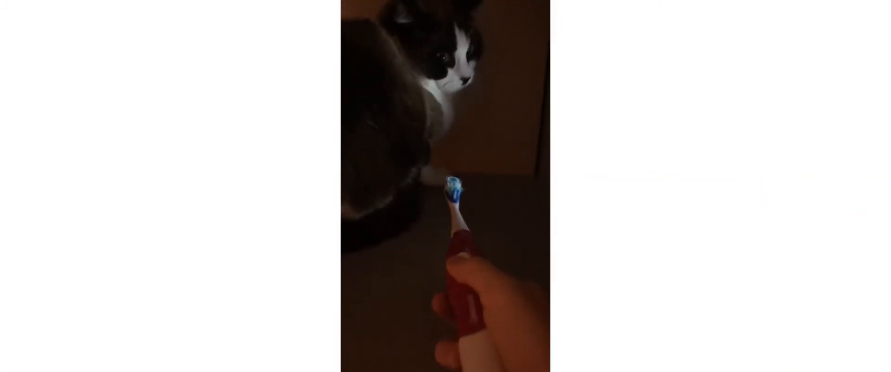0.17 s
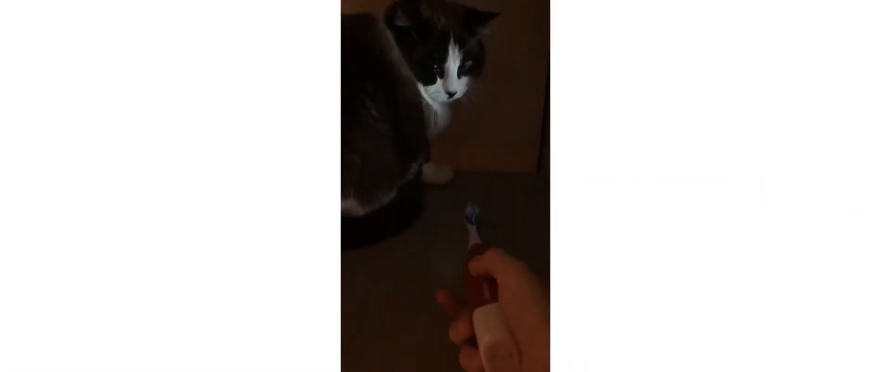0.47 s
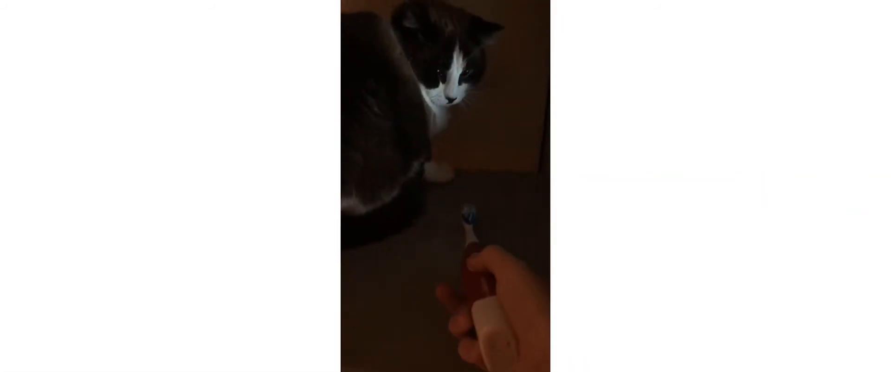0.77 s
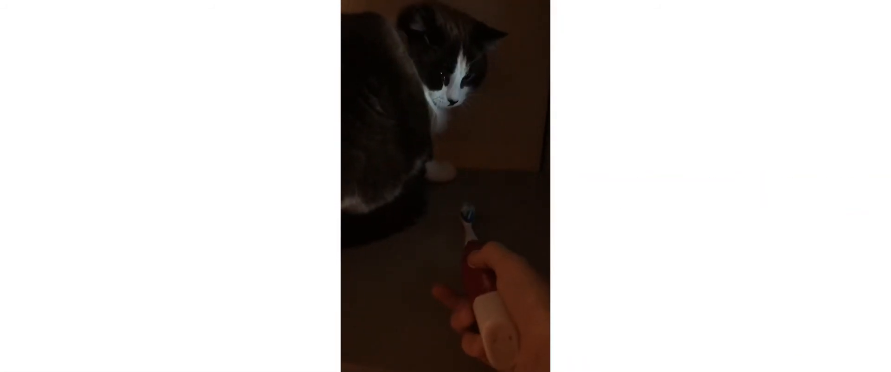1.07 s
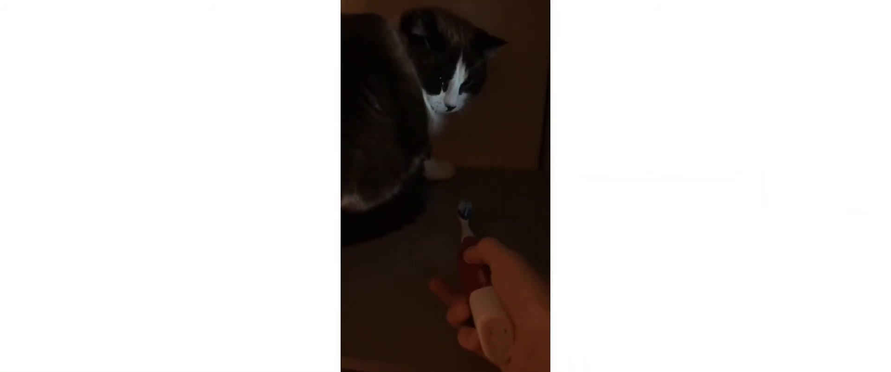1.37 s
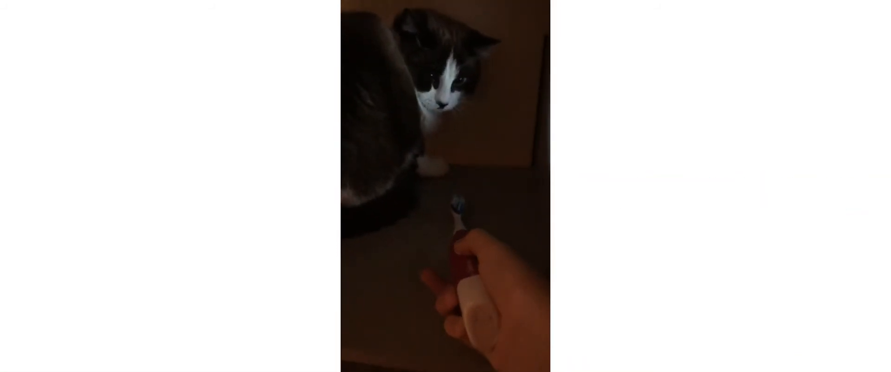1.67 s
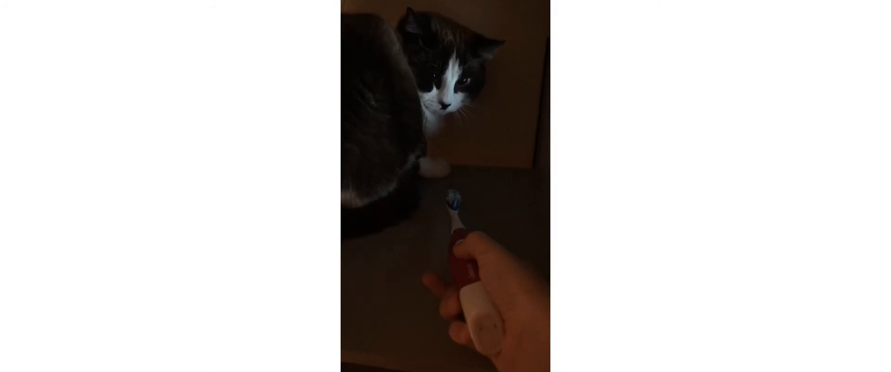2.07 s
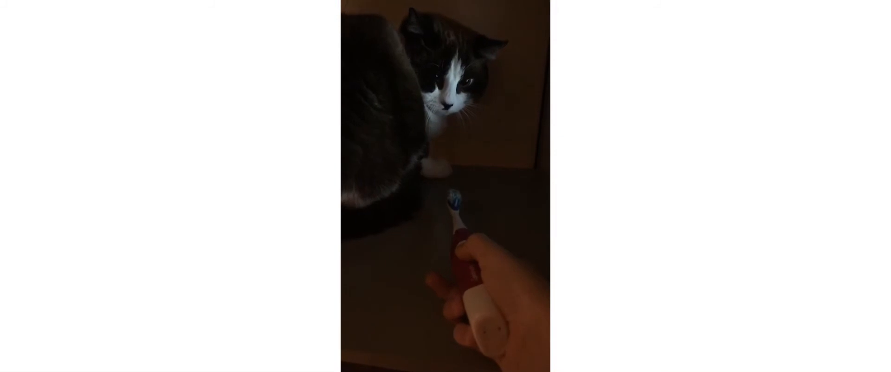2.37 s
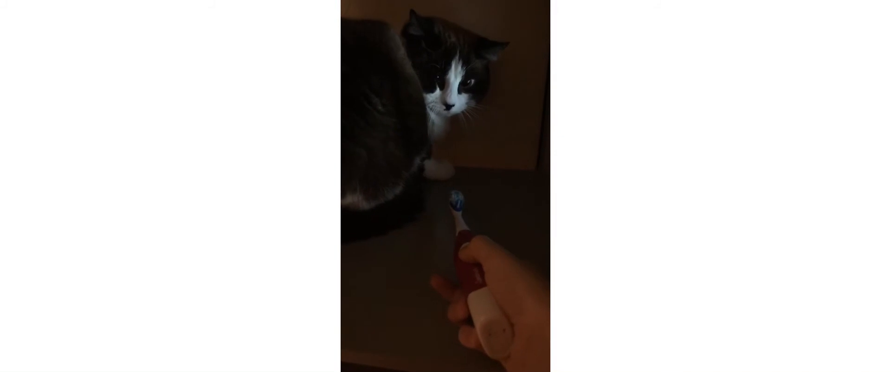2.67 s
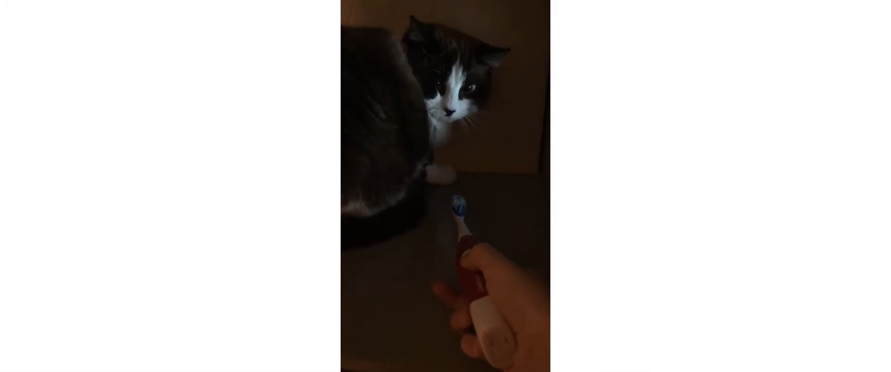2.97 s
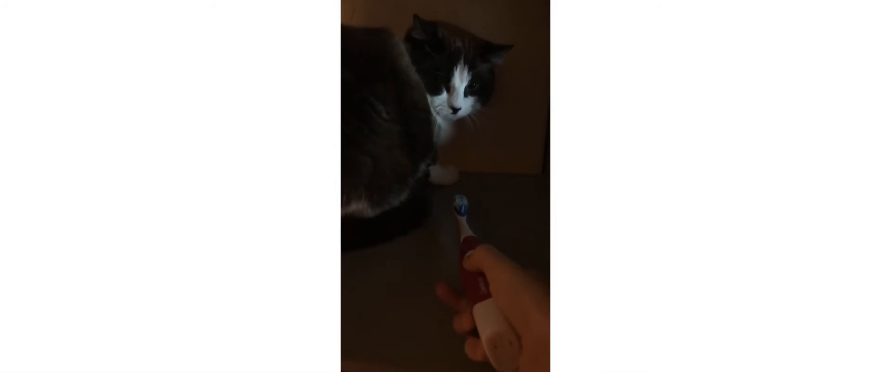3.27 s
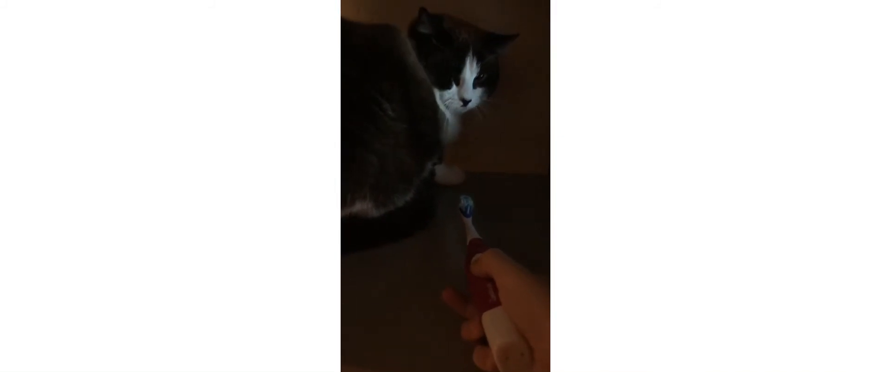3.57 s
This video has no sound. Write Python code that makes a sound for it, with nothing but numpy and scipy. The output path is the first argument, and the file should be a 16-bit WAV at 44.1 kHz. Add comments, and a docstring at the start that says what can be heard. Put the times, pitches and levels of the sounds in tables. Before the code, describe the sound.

Electric toothbrush running free, a rapid harsh rattling buzz, close and dry in a quiet room.

```python
"""A hard, bright rattle buzzing at about 57 swings a second: a battery toothbrush running free in the hand,
close by in a quiet room. Its drive knocks through its play at both ends of the swing (click trains).
The knocks and the rubbing gears (swelling noise grains) ring the plastic handle (resonators).
Under them lie faint drive tones and a motor whine (sines), a low hum and room air (filtered noise)."""
import sys
import numpy as np
from scipy import signal
from scipy.fft import rfft, irfft
from scipy.io import wavfile
from scipy.ndimage import uniform_filter1d

SR = 44100
rng = np.random.default_rng(int(sys.argv[2]) if len(sys.argv) > 2 else 0)


def bounce(signal):
    """Save signal as a 16-bit WAV file at the path given by the first command-line argument."""
    frames = np.transpose(np.atleast_2d(signal))
    limited = np.clip(frames, -1, 1)
    pcm = np.round(limited * 32767).astype(np.int16)
    wavfile.write(sys.argv[1], SR, pcm)


N = 164052

# Drive speed: (time [s], rate [swings/s])
DRIVE_SPEED = [(0.0, 57.5), (0.2, 56.91), (0.4, 56.75), (0.55, 56.83), (0.7, 57.14), (0.8, 56.72),
               (0.92, 56.9), (1.2, 57.12), (1.6, 56.94), (1.85, 56.68), (2.2, 56.71), (2.4, 56.53),
               (2.6, 56.63), (2.95, 56.32), (3.3, 56.47), (3.72, 56.2)]
START_SWINGS = .04
# Knocks in one swing: (place [swings], thud level [dB], tick level [dB], timing scatter [s], level scatter [dB])
SWING_KNOCKS = [(-.125, -12, -2.5, .00026, 1.6), (-.026, 0, -3, .00016, 1.2),
                (.083, -5.5, -17, .00018, 1.7), (.407, -10.5, -4.5, .00022, 1.8)]
# Colour of the dull thuds: (frequency [Hz], gain [dB])
THUD_COLOUR = [(100, -29.5), (500, -25), (1050, -23.5), (1300, -17.5), (2000, -10.5), (3050, -7.5),
               (3550, -2), (4400, -4), (5200, -2.5), (7200, -2), (7600, -7.5), (9000, -6.5), (11000, -8.5),
               (12500, -3), (13100, -37), (16000, 1.5), (18000, -22)]
# Colour of the bright ticks: (frequency [Hz], gain [dB])
TICK_COLOUR = [(100, -39), (1000, -33), (1700, -12), (3000, -8.5), (5200, 0), (7100, 0), (7700, -9),
               (9500, -0.5), (11000, -2), (13300, -2), (15000, -3), (16000, -9), (18000, -14)]
CHATTER_S, CHATTER_DB = 0.00033, 0  # decay time constant, level relative to the knock
SPREAD_S, SPREAD_STEP_HZ = .00032, 687  # scale of the random delays, spacing in frequency
# Colour of the gear friction: (frequency [Hz], gain [dB])
RUB_COLOUR = [(100, -27), (600, -22.5), (1050, -21.5), (1270, -4), (1550, -7.5), (2400, -5), (3000, -3.5),
              (3600, -1.5), (4400, -4), (5200, -2), (7200, -1.5), (7600, -5), (12000, -9), (16000, -21),
              (18000, -42)]
RUB_DB, RUB_GRAIN_DB = -6.5, 3  # level relative to the knocks, scatter of grain size
RUB_SWELL, RUB_PEAK_SWINGS = 0.16, 0.49  # depth as a fraction, place of the peak in the swing
# Handle resonances, level relative to the plain shell:
# (frequency [Hz], width [Hz], level in grip 0 [dB], in grip 1 [dB], in grip 2 [dB])
HANDLE_MODES = [(1730, 49, 4.5, -1, -7), (1770, 61, -21, 1, 6), (2220, 97, -26, -18, 3),
                (2385, 95, 7.5, 6, -11), (3717, 240, -5.5, -3.5, 1), (4240, 210, -30, 3.5, 4),
                (4770, 216, 2, 6, 4), (5520, 204, 3.5, -3, -1.5), (6530, 120, 4, 0.5, -25),
                (8550, 150, 4, -6, -4), (9350, 260, -5, -10, -15), (9770, 80, -13, -4, 0),
                (10480, 160, -2, -18, -6), (12540, 360, -19, -6, -6)]
# Hand changing its grip twice: (time [s], grip [0-2])
GRIP_POSITION = [(.24, 0), (.42, 1), (1.75, 1.08), (2.1, 2)]
EARLY_S, EARLY_DB = 0.0031, -5  # echoes off hand and floor: decay time constant, level
TAIL_S, TAIL_DB = 0.006, -9.5  # room tail: decay time constant, level
THUD_WET_DB, TICK_WET_DB = 1.5, 0  # the ticks echo less
# Uneven loudness of four rattle bands over time, with a brief dip near 0.43 s;
# only the departure from each band's mean counts:
# (time [s], low mids [dB], presence [dB], treble [dB], top [dB])
RATTLE_BANDS = [(0.0, -44.0, -35.3, -37.5, -44.2), (0.2, -43.1, -34.0, -35.3, -41.9),
                (0.3, -44.5, -34.2, -37.9, -44.5), (0.38, -41.9, -32.1, -38.6, -39.5),
                (0.43, -43.8, -34.4, -40.2, -45.6), (0.5, -43.4, -32.8, -37.2, -41.1),
                (0.85, -43.2, -34.1, -37.5, -40.7), (1.3, -44.4, -33.1, -37.1, -41.6),
                (1.8, -45.4, -34.0, -38.8, -41.9), (2.05, -45.8, -34.1, -38.6, -45.8),
                (2.45, -45.9, -34.7, -38.0, -45.6), (3.1, -46.1, -35.1, -39.2, -46.7),
                (3.5, -45.8, -33.5, -37.6, -46.6), (3.72, -45.3, -34.1, -37.8, -46.7)]
# Centres of those four bands: (frequency [Hz])
RATTLE_CENTRES_HZ = (1930, 5250, 10900, 13700)
RATTLE_DB = -31.5
# Clean drive tones: (multiple of the swing rate [1], level [dB])
DRIVE_HARMONICS = [(2, -81), (3, -72), (5, -81), (10, -79.5), (11, -73), (13, -76), (17, -75.5)]
# Motor whine: (time [s], frequency [Hz], level [dB])
MOTOR_WHINE = [(0, 495.6, -78), (.87, 499.4, -69.5), (2.2, 493.6, -68), (3.72, 491, -65.5)]
# Thin high motor tone, sinking in level as the brush is lowered: (time [s], level [dB])
MOTOR_OVERTONE = [(0, -61.5), (.35, -65), (1.2, -77), (3.72, -78)]
OVERTONE_HZ = 1160
# Low hum: (time [s], level [dB])
HUM_LEVEL = [(0.02, -62), (0.09, -67), (0.84, -59.5), (2.66, -62.5), (3.24, -67), (3.5, -76), (3.57, -77),
             (3.7, -69)]
HUM_HZ, HUM_THIRD_DB = 59.7, -10.5
# Colour of the room air: (frequency [Hz], density [dB per Hz, relative])
AIR_COLOUR = [(20, -44), (32, -10), (45, 0), (80, 2.5), (130, 1.5), (250, -6.5), (500, -7), (1000, -5),
              (4000, -10), (16000, -44)]
AIR_DB = -60.5
TOP_HZ = 15750


def knocks(turn, t):
    """Linkage play: four scattered contacts a swing, each a thud and a tick with chatter and echoes."""
    swings = np.arange(int(turn[-1]) + 2)
    thuds = ticks = 0
    for place, thud_db, tick_db, scatter_s, scatter_db in SWING_KNOCKS:
        late, hard, bright = np.clip(rng.standard_normal((len(swings), 3)).T, -2, 2)
        times_s = np.interp(swings + place, turn, t, left=-1, right=10) + scatter_s * late
        thud_sizes = undb(thud_db + scatter_db * hard)
        tick_sizes = undb(tick_db + scatter_db * (hard + bright) / np.sqrt(2))
        thuds = thuds + disperse(clicks(times_s, thud_sizes))
        ticks = ticks + disperse(clicks(times_s, tick_sizes))
    thuds = colour(room(chatter(thuds), THUD_WET_DB), THUD_COLOUR)
    ticks = colour(room(chatter(ticks), TICK_WET_DB), TICK_COLOUR)
    return level(thuds + ticks, 0)


def chatter(hits):
    """The contact chatters briefly: a short noise burst follows each hit."""
    return hits + undb(CHATTER_DB) * smear(hits, CHATTER_S)


def disperse(x):
    """Bending waves in the shell arrive at different times by pitch: an all-pass ring, fixed within a call."""
    f = np.fft.rfftfreq(N, 1 / SR)
    delays_s = SPREAD_S * np.minimum(rng.exponential(size=128), 3)
    delay_s = np.interp(f / SPREAD_STEP_HZ, np.arange(len(delays_s)), delays_s)
    phase = 2 * np.pi * np.cumsum(delay_s) * f[1]  # integral of delay over frequency
    return irfft(rfft(x) * np.exp(-1j * phase), N)


def gears(turn):
    """Gear friction: noise grains of uneven size that swell once a swing."""
    grains = rng.standard_normal(N) * undb(RUB_GRAIN_DB * rng.standard_normal(N))
    swell = 1 + RUB_SWELL * np.cos(2 * np.pi * (turn - RUB_PEAK_SWINGS))
    return level(colour(grains * swell, RUB_COLOUR), RUB_DB)


def handle(x, t):
    """The plastic shell adds short resonances; the grip decides how freely each one rings."""
    grip = np.interp(t, *np.array(GRIP_POSITION).T)
    out = x
    for hz, width_hz, *grip_db in HANDLE_MODES:
        mode = signal.lfilter(*signal.iirpeak(hz, hz / width_hz, fs=SR), x)
        gain = np.interp(grip, np.arange(len(grip_db)), undb(grip_db))
        out = out + gain * mode
    return out


def band_levels(x, t):
    """Four overlapping bands of the rattle rise and fall about their mean levels in dB."""
    times_s, *curves = np.array(RATTLE_BANDS).T
    f = np.fft.rfftfreq(N, 1 / SR)
    spectrum = rfft(x)
    out = 0
    for shape, curve in zip(np.eye(len(curves)), curves):
        band = irfft(spectrum * np.interp(f, RATTLE_CENTRES_HZ, shape), N)
        db = np.interp(t, times_s, curve)
        out = out + band * undb(db - db.mean())
    return out


def motor(turn, t):
    """Motor whine and thin overtone, plus wavering sines at multiples of the swing rate."""
    times_s, hz, db = np.array(MOTOR_WHINE).T
    whine_cycles = np.cumsum(np.interp(t, times_s, hz)) / SR
    out = tone(whine_cycles, np.interp(t, times_s, db))
    out = out + tone(OVERTONE_HZ * t, np.interp(t, *np.array(MOTOR_OVERTONE).T))
    for multiple, db in DRIVE_HARMONICS:
        out = out + tone(round(multiple) * turn, db + 1.5 * walk(5.42))
    return out


def room(x, wet_db):
    """Quick echoes off nearby surfaces, then a short tail, as two decaying noise smears."""
    early = undb(EARLY_DB) * smear(x, EARLY_S)
    tail = undb(TAIL_DB) * smear(x, TAIL_S)
    return x + undb(wet_db) * (early + tail)


def background(t):
    """Low hum with its third harmonic, over room air made of coloured noise."""
    db = np.interp(t, *np.array(HUM_LEVEL).T)
    hum = tone(HUM_HZ * t, db) + tone(3 * HUM_HZ * t, db + HUM_THIRD_DB)
    air = level(colour(rng.standard_normal(N), AIR_COLOUR), AIR_DB)
    return hum + air


def undb(db):
    """Decibels to gain."""
    return 10 ** (np.asarray(db) / 20)


def level(x, db):
    """Scale to unit rms, then apply a fixed or moving level."""
    return x * undb(db) / np.sqrt(np.mean(x ** 2))


def tone(cycles, db):
    """A sine at an rms level, from a random phase."""
    return level(np.sin(2 * np.pi * (cycles + rng.random())), db)


def walk(rate_hz):
    """Smooth random wander with a spread near 1: held noise, averaged twice."""
    k = int(SR / rate_hz)
    steps = np.repeat(rng.standard_normal(N // k + 1), k)
    return 2.3 * uniform_filter1d(uniform_filter1d(steps, k), k)[:N]


def clicks(times_s, sizes):
    """One impulse at each time."""
    inside = (times_s >= 0) & (times_s * SR < N)
    return np.bincount((times_s[inside] * SR).astype(int), sizes[inside], N)


def smear(x, decay_s):
    """Dense, ever-changing echoes: noise shaped by the decaying energy of the sound."""
    keep = np.exp(-1 / (decay_s * SR))
    energy = signal.lfilter([1 - keep], [1, -keep], x ** 2 + 1e-18)
    return np.sqrt(energy) * rng.standard_normal(N)


def colour(x, points, size=4096):
    """Causal minimum-phase filter through (Hz, dB) points, by folding the cepstrum."""
    hz, db = np.array(points).T
    f = np.maximum(np.fft.rfftfreq(size, 1 / SR), 1)
    cepstrum = irfft(np.log(undb(np.interp(np.log(f), np.log(hz), db))))
    cepstrum[1:size // 2] *= 2
    cepstrum[size // 2 + 1:] = 0
    response = irfft(np.exp(rfft(cepstrum)))
    return signal.fftconvolve(x, response)[:N]


def scene():
    """Knocks and gears drive the handle; motor and background add to the rattle."""
    t = np.arange(N) / SR
    turn = START_SWINGS + np.cumsum(np.interp(t, *np.array(DRIVE_SPEED).T)) / SR
    shell = handle(knocks(turn, t) + gears(turn), t)
    rattle = level(band_levels(shell, t), RATTLE_DB)
    return (rattle + motor(turn, t) + background(t))[None]


def record(dry):
    """The recorder cuts the top steeply: an elliptic low-pass."""
    return signal.sosfilt(signal.ellip(12, .1, 80, TOP_HZ, fs=SR, output="sos"), dry)


dry = scene()
out = record(dry)
bounce(out)
```